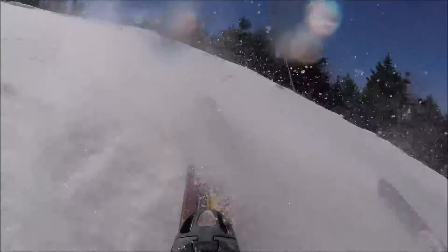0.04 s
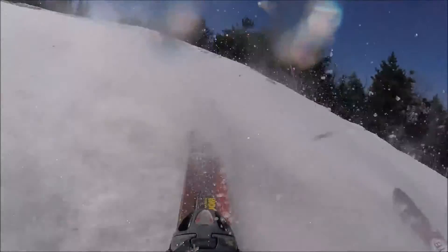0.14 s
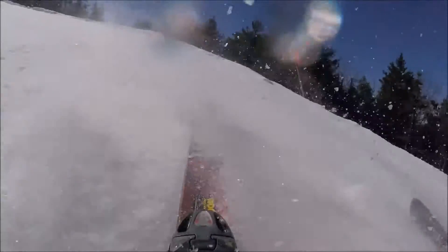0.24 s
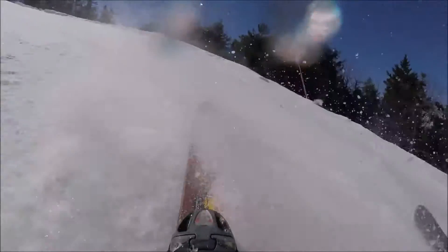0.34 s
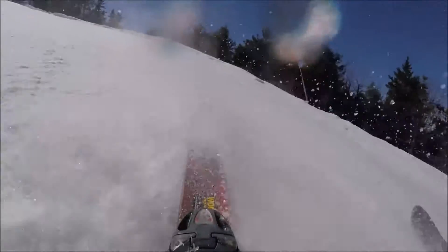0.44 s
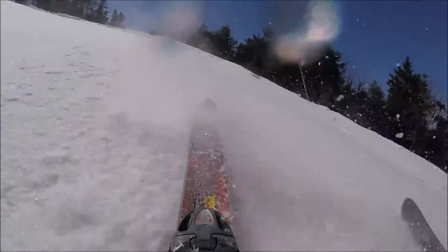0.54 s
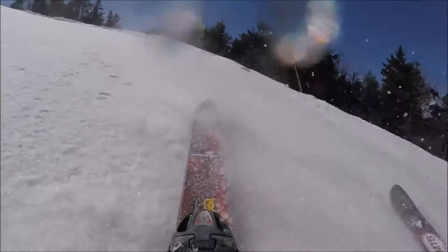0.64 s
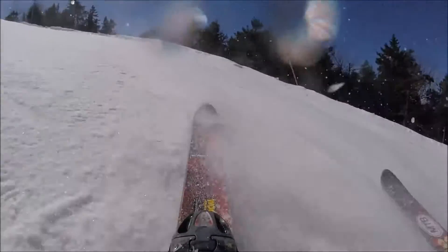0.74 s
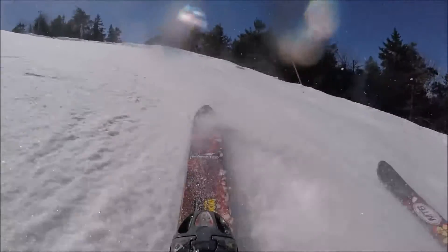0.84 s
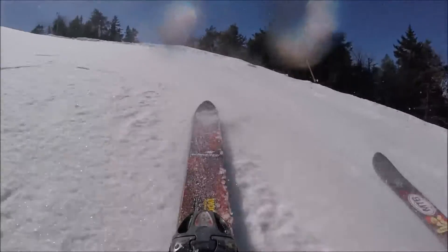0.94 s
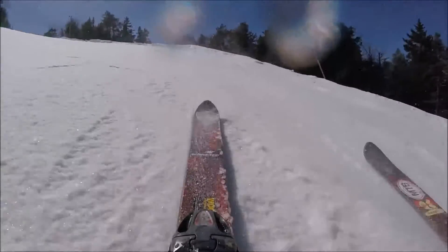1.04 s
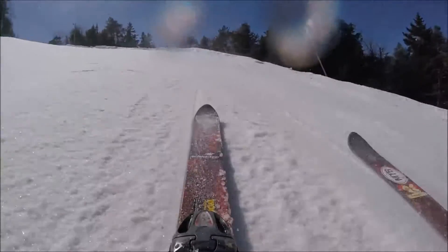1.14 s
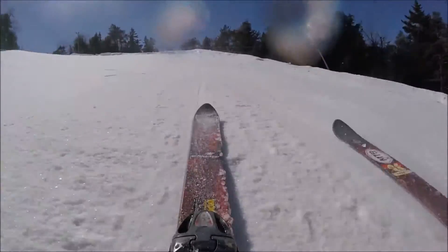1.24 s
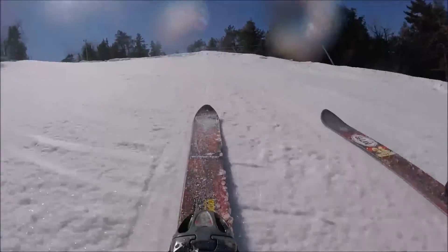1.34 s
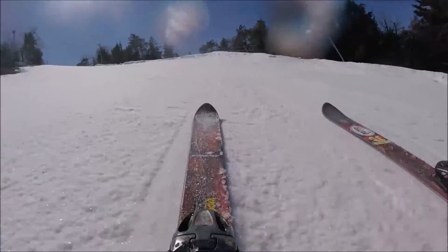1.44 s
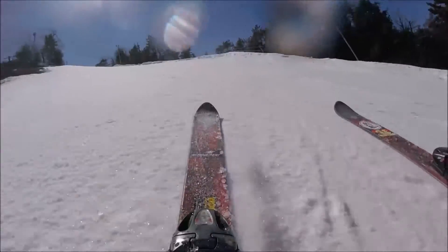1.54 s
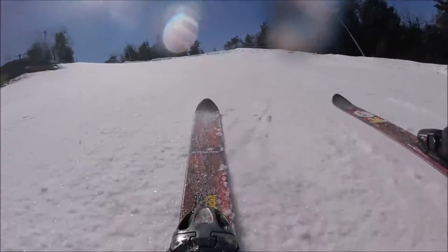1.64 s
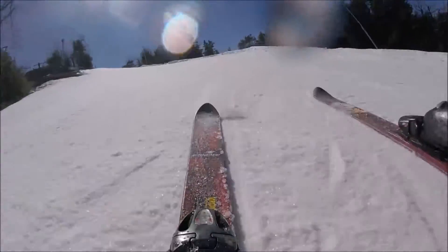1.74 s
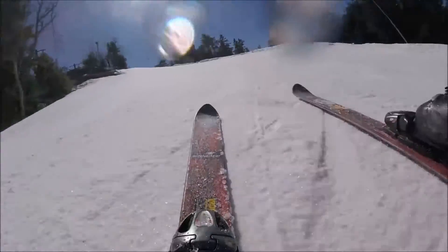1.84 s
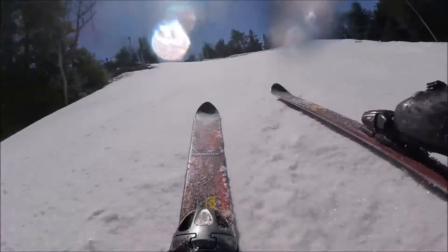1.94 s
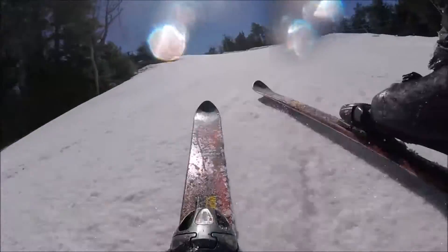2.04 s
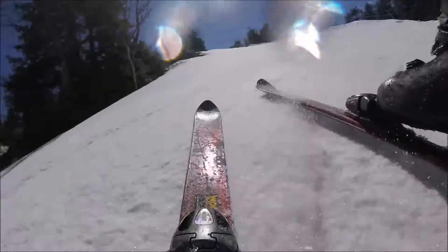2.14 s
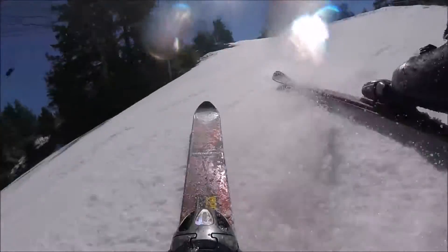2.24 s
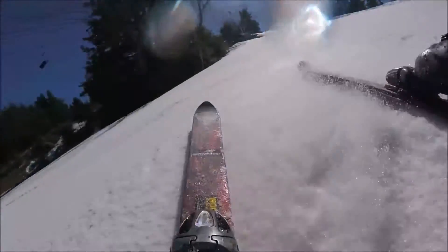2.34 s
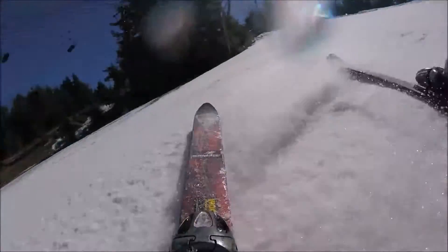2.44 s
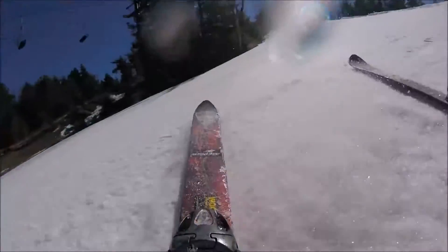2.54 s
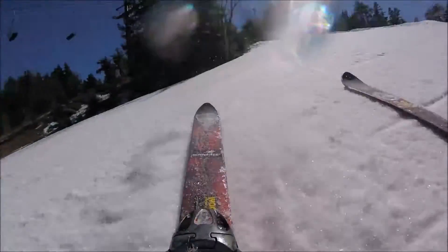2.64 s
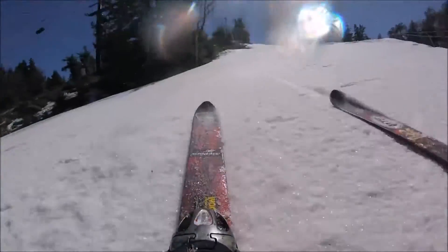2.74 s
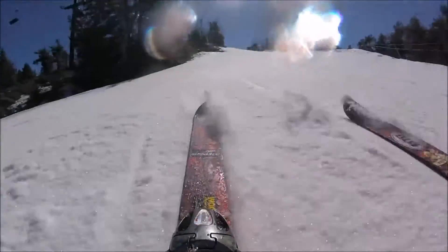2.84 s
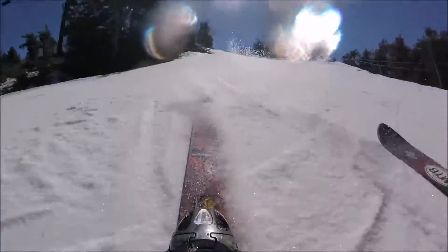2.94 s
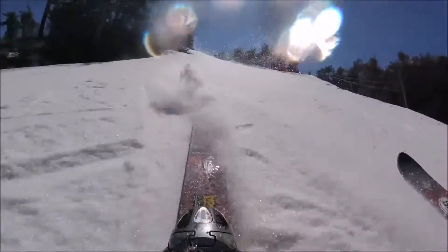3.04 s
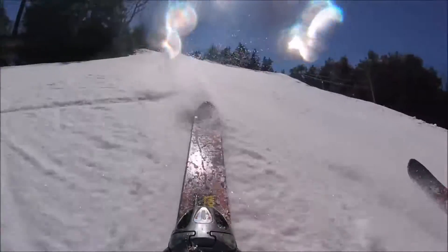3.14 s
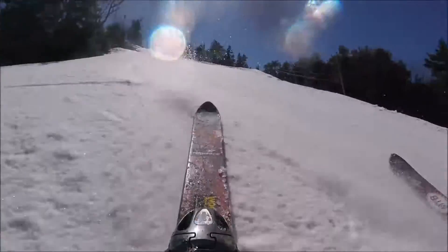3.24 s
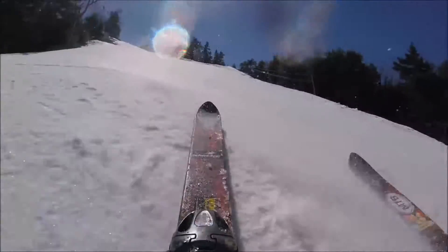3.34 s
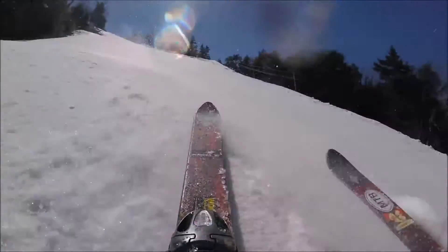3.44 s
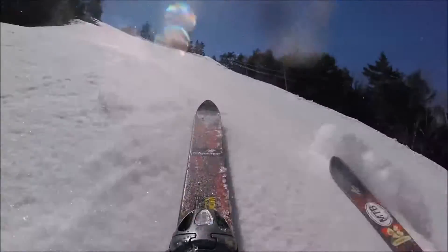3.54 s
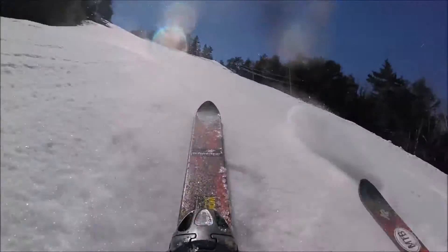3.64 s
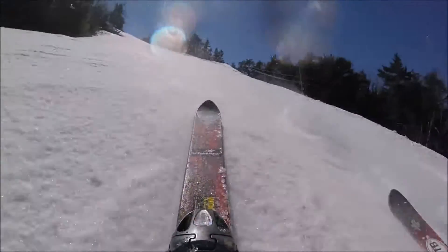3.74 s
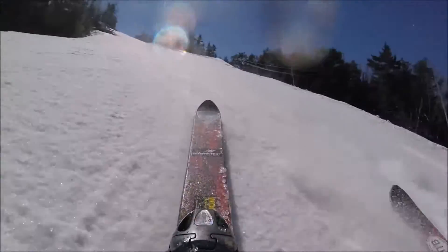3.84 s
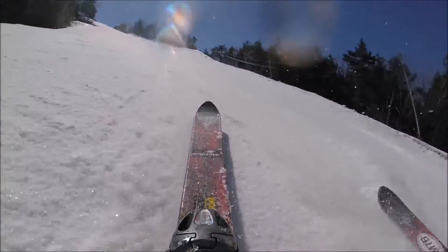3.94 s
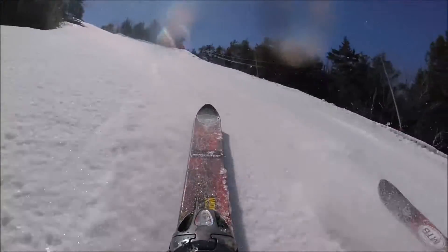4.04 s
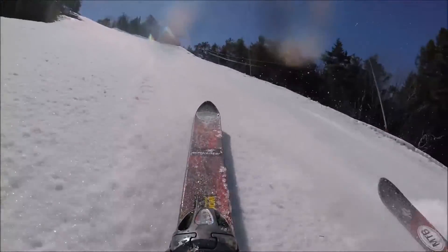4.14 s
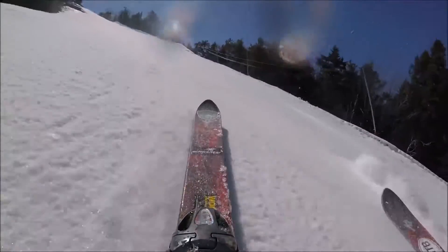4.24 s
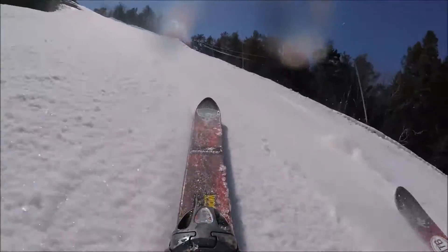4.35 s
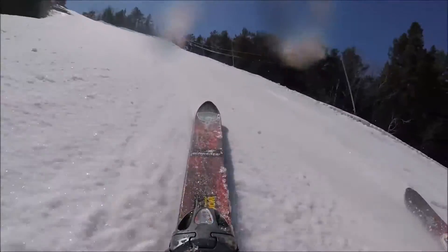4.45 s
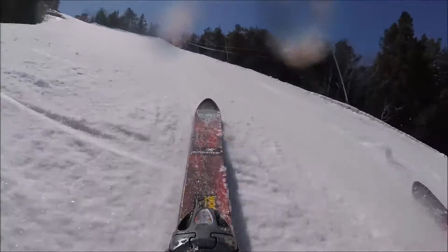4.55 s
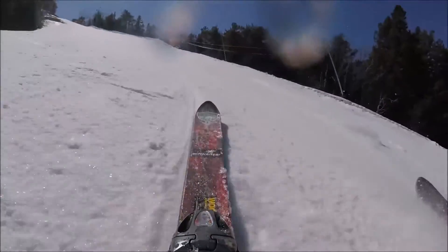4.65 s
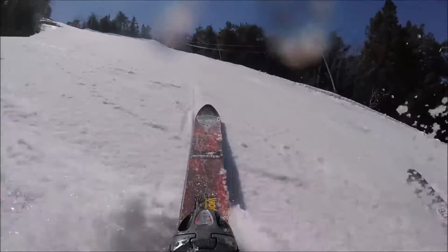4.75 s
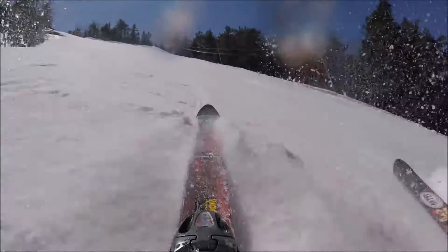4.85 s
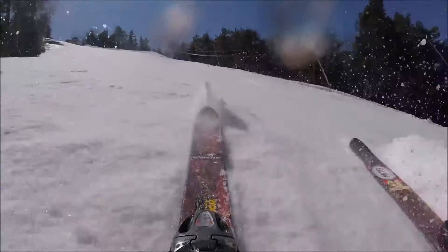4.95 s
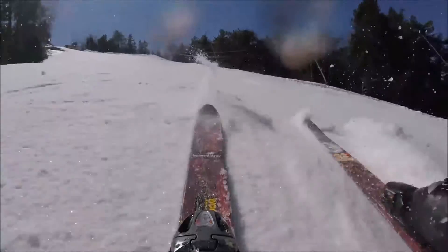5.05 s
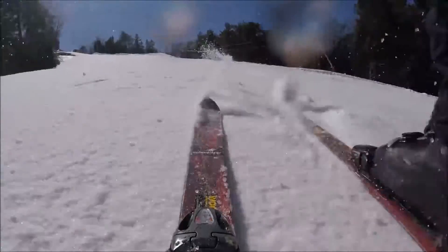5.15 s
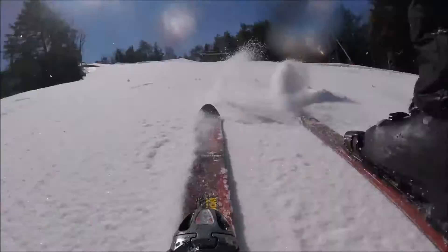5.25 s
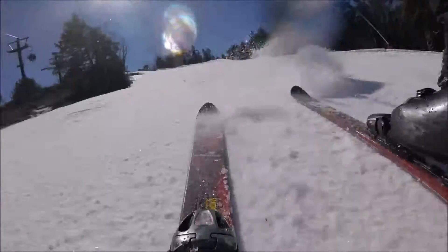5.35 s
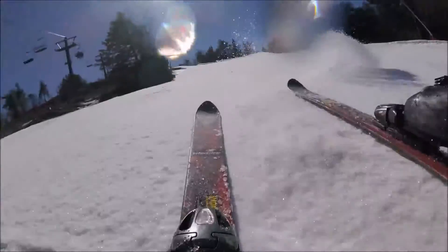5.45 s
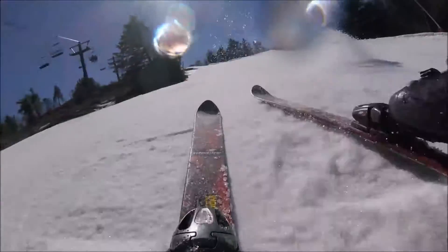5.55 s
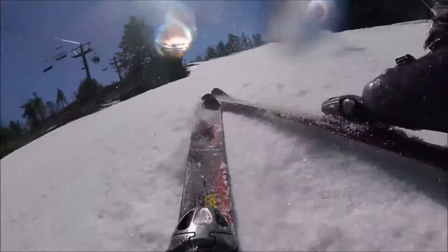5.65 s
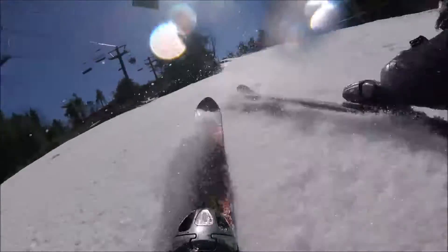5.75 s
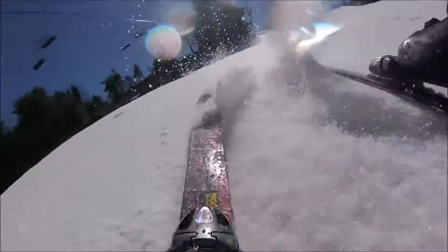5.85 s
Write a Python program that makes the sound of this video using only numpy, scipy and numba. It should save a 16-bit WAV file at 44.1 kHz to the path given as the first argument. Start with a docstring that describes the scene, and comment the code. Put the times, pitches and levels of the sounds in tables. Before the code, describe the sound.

Skis carve through soft snow, a grainy scrape and crunch swelling with each turn and easing between. Fine spray hisses on the camera case with a thin, high ring. The microphone rides just above one ski, so bumps come through as low shuddering thumps while wind buffets and rumbles. After a strong opening turn and a quieter glide, several turns follow closely, with a few sharp knocks from hard lumps. The open slope gives no echo.

```python
"""Ski edges carve turns through soft snow, crushing and shearing it in clumps.
Heard from a cased camera riding just above one ski: fine spray hisses on the case and rings it
near 5.5 kHz, and a few hard lumps knock. Bumps shake the ski and camera mount near 75 Hz,
and wind buffets the microphone."""
import sys
import numpy as np
from scipy import signal
from scipy.fft import rfft, irfft, next_fast_len
from scipy.io import wavfile
from scipy.ndimage import uniform_filter1d
from numba import njit

SR = 44100
rng = np.random.default_rng(int(sys.argv[2]) if len(sys.argv) > 2 else 0)


def master_out(mix):
    """Clip the mix to full scale and print it as 16-bit PCM to the path in sys.argv[1]."""
    frames = np.transpose(np.atleast_2d(mix))
    ceiling = np.clip(frames, -1, 1)
    pcm = np.round(ceiling * 32767).astype(np.int16)
    wavfile.write(sys.argv[1], SR, pcm)


N = 259749
TIME_S = np.arange(N) / SR


def undb(db):
    return 10 ** (np.asarray(db) / 20)


def unit_rms(x):
    return x / np.sqrt(np.mean(x ** 2))


def power_sum(gains):
    """Joint gain of unrelated noises."""
    return np.sqrt(sum(np.square(g) for g in gains))


def curves(table):
    """Each column after time_s, interpolated linearly."""
    time_s, *columns = np.transpose(table)
    return [np.interp(TIME_S, time_s, column) for column in columns]


def swell(centre_s, half_s):
    """Gaussian hump of height 1."""
    out = np.zeros(N)
    near = slice(*np.searchsorted(TIME_S, [centre_s - 4 * half_s, centre_s + 4 * half_s]))
    out[near] = np.exp(-((TIME_S[near] - centre_s) / half_s) ** 2)
    return out


def humps(table):
    """Joint gain of a row of swells."""
    return power_sum(undb(db) * swell(centre_s, half_s) for centre_s, half_s, db in table)


def fade(full_s, hold_s, rise_s_per_10db, fall_s_per_10db):
    """Rise, hold and fall, linear in dB."""
    before_s = np.maximum(full_s - TIME_S, 0)
    after_s = np.maximum(TIME_S - full_s - hold_s, 0)
    return undb(-10 * (before_s / rise_s_per_10db + after_s / fall_s_per_10db))


def strike(age_s, rise_s, t60_s):
    """Exponential attack and decay."""
    return (1 - np.exp(-age_s / rise_s)) * np.exp(-np.log(1000) * age_s / t60_s)


def drift(rate_hz):
    """Smooth random drift, rms 1."""
    steps = rng.standard_normal(N // 10)
    return unit_rms(np.interp(TIME_S * rate_hz, np.arange(len(steps)), steps))


def grains(rate_hz, spread_db):
    """Snow crystals break at random moments: many small, a few large."""
    breaks = rng.random(N) < rate_hz / SR
    size = undb(spread_db * np.minimum(rng.exponential(size=N), 2 * np.e))
    return unit_rms(breaks * size * rng.choice([-1, 1], N))


def steady(x, span_s):
    """Hold rms 1 over the span, keeping faster flutter."""
    size = int(span_s * SR) + 1
    return x / np.sqrt(uniform_filter1d(uniform_filter1d(x ** 2, size), size) + 1e-12)


def colour(x, spectrum):
    """Minimum-phase filter from (freq_hz, gain_db) points."""
    size = next_fast_len(len(x) + 8192, True) * 2
    freq_hz, gain_db = np.transpose(spectrum)
    bins_hz = np.maximum(np.fft.rfftfreq(size, 1 / SR), 1)
    gain = undb(np.interp(np.log(bins_hz), np.log(freq_hz), gain_db))
    cepstrum = irfft(np.log(gain))
    cepstrum[1:size // 2] *= 2
    cepstrum[size // 2 + 1:] = 0
    return irfft(rfft(x, size) * np.exp(rfft(cepstrum)))[:len(x)]


def resonate(x, centre_hz, width_hz):
    """Fixed resonance, peak gain 1."""
    return signal.lfilter(*signal.iirpeak(centre_hz, centre_hz / width_hz, fs=SR), x)


@njit
def sweep(x, centre_hz, width_hz):
    """Moving resonance, peak gain 1."""
    out, band_state, low_state = np.empty(len(x)), 0., 0.
    for i in range(len(x)):
        step, damping = np.tan(np.pi * centre_hz[i] / SR), width_hz / centre_hz[i]
        band = (band_state + step * (x[i] - low_state)) / (1 + step * (step + damping))
        band_state = 2 * band - band_state
        low_state += 2 * step * band
        out[i] = damping * band
    return out


# centre_s, half_s, drop_db
LIFT_OFFS = [(1.3, .015, 3), (1.52, .03, 2), (1.785, .016, 6), (2.825, .03, 9), (3.82, .025, 2),
             (5.035, .06, 12.5)]


def lift(share=1):
    """The skis go light and leave the snow: the gain dips by a share of drop_db."""
    drop_db = sum(db * swell(centre_s, half_s) for centre_s, half_s, db in LIFT_OFFS)
    return undb(-share * drop_db)


# time_s, offset_db
GLIDE_PACE = [(0, -3), (1.0, -4.5), (1.5, -3), (2.1, -1.5), (2.8, -1.5), (3.7, .7), (5.1, 0), (5.89, -.5)]


def glide(full_speed_db):
    """Gain of the skis running flat; it follows their pace."""
    return undb(full_speed_db + curves(GLIDE_PACE)[0])


# time_s, level_db
AIRFLOW = [(0, -29), (.15, -26.5), (.75, -31.8), (1.05, -35), (1.45, -40.5), (1.7, -36), (2.25, -25.3),
           (2.55, -25), (2.78, -30), (3.02, -24.5), (3.15, -36), (3.45, -30.5), (3.9, -34), (4.3, -29),
           (4.65, -38), (4.95, -44), (5.14, -34.5), (5.5, -32), (5.89, -40)]
# centre_s, half_s, level_db
WIND_SLAPS = [(.078, .018, -18), (1.255, .01, -28), (1.752, .01, -26), (2.14, .03, -22), (2.49, .03, -23),
              (2.735, .012, -25), (2.85, .04, -27), (3.46, .015, -25), (3.78, .012, -25), (5.42, .012, -24)]
RUMBLE_GUSTS = [(.23, .1, -20), (.58, .05, -26), (.88, .08, -35), (1.24, .06, -37), (2.56, .08, -29),
                (2.93, .08, -21), (3.2, .1, -32), (3.47, .07, -15.5), (3.98, .08, -28), (4.42, .06, -22),
                (4.72, .04, -29), (4.97, .08, -35), (5.51, .11, -22)]
# freq_hz, gain_db
EDDY_SPECTRUM = [(50, -25.5), (95, -3), (125, 1.5), (165, -1), (220, -4.5), (320, -20.5), (520, -19.5),
                 (1200, -58)]
RUMBLE_SPECTRUM = [(8, -28), (18, -7), (25, -3), (32, 0), (42, 7), (52, 3), (75, -10), (200, -75)]


def wind():
    """Eddies buffet the microphone, harder at jolts and slaps, over a deep gusting rumble."""
    airflow_db, = curves(AIRFLOW)
    # each jolt sweeps the microphone through the air
    thumps = humps([(start_s + .015, .035, peak_db - 22) for start_s, peak_db in MOUNT_JOLTS])
    turbulence = rng.standard_normal(N) * undb(2.6 * drift(70))
    eddies = steady(colour(turbulence, EDDY_SPECTRUM), span_s=.27)
    puffs = unit_rms(undb(1.6 * np.minimum(drift(32), 1)))
    rumble = steady(colour(rng.standard_normal(N), RUMBLE_SPECTRUM), span_s=.12)
    eddy_gain = power_sum([undb(airflow_db) * lift(share=.35), thumps, humps(WIND_SLAPS)])
    rumble_gain = power_sum([undb(airflow_db - 8.5), humps(RUMBLE_GUSTS)])
    return eddies * puffs * eddy_gain + rumble * rumble_gain


# start_s, peak_db
MOUNT_JOLTS = [(.055, -8), (.135, -10.5), (.74, -14.5), (1.245, -20), (1.375, -21), (1.64, -19.5),
               (1.93, -11.5), (2.1, -9), (2.15, -11), (2.185, -7), (2.225, -9), (2.27, -10), (2.471, -8.5),
               (2.86, -16), (3.33, -11), (3.501, -7), (3.56, -10), (3.618, -5), (3.78, -12), (3.91, -14),
               (4.18, -12), (4.295, -6.5), (4.345, -5.5), (4.42, -11), (4.52, -15), (5.43, -7),
               (5.49, -7.5), (5.555, -13), (5.67, -17), (5.799, -8.5)]


def mount(pitch_hz=75, ground_db=-31.5):
    """The camera mount shudders with rough ground and rushing air; bumps set it swinging."""
    airflow_db, = curves(AIRFLOW)
    ground = resonate(rng.standard_normal(N), pitch_hz, width_hz=81)
    shudder = steady(resonate(ground, pitch_hz, width_hz=17), span_s=.065) * undb(1.5 * drift(25))
    out = shudder * power_sum([undb(airflow_db + 6), undb(ground_db)]) * lift()
    swings_hz = pitch_hz * (1 + .025 * rng.standard_normal(len(MOUNT_JOLTS)))
    for (start_s, peak_db), swing_hz in zip(MOUNT_JOLTS, swings_hz):
        start = int(start_s * SR)
        span = slice(start, start + SR // 2)
        age_s = TIME_S[:len(out[span])]
        envelope = strike(age_s, rise_s=.015, t60_s=.17)
        envelope /= envelope.max()
        swing = undb(peak_db) * np.sin(2 * np.pi * swing_hz * age_s)
        out[span] = out[span] * (1 - envelope) + swing * envelope
    return out


# start_s, crack_db, crack_t60_s, thud_peak_db, thud_hz
HARD_LUMPS = [(.167, -24, .015, -21, 480), (1.840, -22.5, .02, -38, 520), (2.372, -24.5, .025, -29, 760),
              (2.468, -21, .018, -22, 520), (2.724, -25, .03, -32, 520), (2.961, -27, .025, -19, 250),
              (2.976, -24, .014, -17, 190), (3.017, -27, .01, -13, 240), (3.460, -28, .015, -19, 300),
              (3.508, -24, .018, -34, 520), (4.514, -23, .026, -30, 520), (4.663, -21, .037, -22, 420),
              (4.724, -24, .03, -20, 700), (4.821, -22, .023, -25, 520), (4.941, -27, .04, -25, 400),
              (5.786, -15.8, .034, -16, 440)]
# freq_hz, gain_db
CRACK_SPECTRUM = [(80, -27), (250, -5.5), (500, 2), (850, 2), (1400, -4), (2200, -6.5), (3300, -12),
                  (4200, -19), (5600, -4), (7000, -45), (12000, -68)]


def knocks():
    """A hard lump crumbles with a short crack; the struck ski thuds."""
    out = np.zeros(N + SR)
    age_s = TIME_S[:SR // 10]
    for start_s, crack_db, crack_t60_s, thud_peak_db, thud_hz in HARD_LUMPS:
        thud = strike(age_s, rise_s=.002, t60_s=.018) * np.sin(2 * np.pi * thud_hz * age_s)
        crumble = strike(age_s, rise_s=.00037, t60_s=crack_t60_s) * rng.standard_normal(len(age_s))
        crack = colour(crumble, CRACK_SPECTRUM)
        crack /= crack[age_s < .006].std()
        start = int(start_s * SR)
        out[start:start + len(age_s)] += undb(crack_db) * crack + undb(thud_peak_db) * thud / thud.max()
    return out[:N]


# centre_s, half_s, level_db
SKI_LANDINGS = [(2.14, .035, -28), (2.99, .07, -24), (3.65, .015, -26), (3.76, .02, -26), (4.35, .03, -27),
                (5.14, .02, -33)]
# freq_hz, gain_db
PACKING_SPECTRUM = [(80, -24), (150, -2), (210, 1), (320, -2), (420, -8), (650, -24), (1500, -55)]


def landings():
    """Weight comes down on a ski and packs the snow with a dull, lumpy thump."""
    packing = colour(grains(rate_hz=900, spread_db=2.5), PACKING_SPECTRUM)
    return steady(packing, span_s=.04) * humps(SKI_LANDINGS)


# centre_s, half_s, level_db
CRUST_PATCHES = [(.333, .008, -29), (2.168, .008, -29), (2.535, .012, -23), (2.70, .012, -30),
                 (2.963, .01, -35), (3.502, .012, -26.5), (3.583, .008, -27), (3.955, .012, -30),
                 (4.138, .012, -29), (4.74, .009, -26.5), (4.822, .008, -32), (5.135, .02, -37)]
# freq_hz, gain_db
CRUST_SPECTRUM = [(600, -20), (1400, -5), (2100, -1), (3000, 0), (4000, -6), (5600, -3), (6500, -12),
                  (9000, -18), (12000, -58)]


def scuffs():
    """An edge catches crust in a brief, bright rasp."""
    rasp = colour(grains(rate_hz=5000, spread_db=2), CRUST_SPECTRUM)
    return steady(rasp, span_s=.02) * humps(CRUST_PATCHES)


# peak_s, rise_s_per_10db, fall_s_per_10db, ring_db, powder_db
SNOW_PLUMES = [(.01, .03, .65, -24.3, -37.5), (.64, .18, .22, -35, -39.5), (1.72, .12, .08, -31, -47),
               (2.04, .14, .25, -30.5, -40), (2.36, .3, .3, -19.4, -35.5), (2.56, .08, .06, -26.5, -41.5),
               (3.16, .15, .25, -25.8, -34.3), (3.28, .05, .08, -32, -36), (3.41, .25, .2, -23, -34),
               (3.98, .17, .22, -22.3, -30.8), (4.13, .04, .04, -28, -35), (4.3, .08, .14, -29.5, -43),
               (4.6, .2, .2, -25.8, -34), (4.74, .1, .27, -25.5, -33.5), (5.33, .22, .1, -23, -38),
               (5.8, .2, .25, -27, -40.5)]
# freq_hz, gain_db
CASE_SPECTRUM = [(1800, -18), (2600, -18.5), (3000, -13.5), (3450, -21), (3900, -23), (4250, -17),
                 (4650, -10.5), (5050, -5), (5400, -1.5), (5700, .6), (5950, -7.5), (6250, -17.5),
                 (7000, -32), (9000, -48)]
POWDER_SPECTRUM = [(4500, -43), (6200, 6.5), (7000, 4), (8000, 0.5), (9000, -4.5), (9900, -10.5),
                   (10900, -12.5), (11500, -28), (12300, -62)]


def spray():
    """Thrown crystals ring the camera case; the finest powder hisses above the ring."""
    plume_ring, plume_powder = power_sum(np.outer(undb(levels_db), fade(peak_s, 0, rise, fall))
                                         for peak_s, rise, fall, *levels_db in SNOW_PLUMES)
    flurries = undb(.61 * drift(40) + drift(250))
    crystals = flurries * grains(rate_hz=9000, spread_db=2)
    ring = steady(colour(crystals, CASE_SPECTRUM), span_s=.14)
    powder = undb(drift(45)) * grains(rate_hz=25000, spread_db=3.7)
    hiss = unit_rms(colour(powder, POWDER_SPECTRUM))
    ring_gain = power_sum([plume_ring, glide(-31)])
    hiss_gain = power_sum([plume_powder, glide(-43.5)])
    return (ring * ring_gain + hiss * hiss_gain) * lift(share=.08)


# centre_s, half_s, level_db
SNOW_HEAPS = [(.12, .1, -28), (.63, .12, -32), (1.0, .025, -31), (1.44, .04, -39), (1.67, .07, -38),
              (2.18, .08, -28.5), (2.5, .08, -27), (2.76, .06, -34), (2.96, .07, -28.5), (3.15, .1, -32),
              (3.6, .08, -32), (3.76, .02, -28), (4.25, .2, -32), (5.14, .02, -32), (5.45, .1, -36)]
# freq_hz, gain_db
SOFT_SNOW_SPECTRUM = [(100, -23), (180, -10), (240, 1), (340, -3), (480, -2.5), (600, -5), (900, -18),
                      (2000, -53)]


def bases(carve_plough):
    """The flat of the skis presses soft snow down in small, lumpy collapses."""
    gain = power_sum([carve_plough, glide(-38), humps(SNOW_HEAPS)])
    collapses = undb(1.8 * drift(110)) * grains(rate_hz=2500, spread_db=2.5)
    return steady(colour(collapses, SOFT_SNOW_SPECTRUM), span_s=.12) * gain * lift()


# full_s, hold_s, rise_s_per_10db, fall_s_per_10db, scrape_db, grit_db, pressure_0_to_1, ski_hz
EDGE_BITES = [(.01, .13, .03, .8, -25.3, -25.8, .05, 900), (.56, .1, .12, .35, -32, -32, .25, 700),
              (1.05, .12, .06, .35, -35, -49, .4, 700), (1.35, .12, .2, .15, -40, -47, .1, 700),
              (1.68, .07, .12, .02, -33, -42, .3, 650), (1.92, .06, .04, .1, -36, -35, .1, 800),
              (2.13, .03, .1, .03, -29, -31, .2, 800), (2.29, .07, .27, .04, -22.8, -28.5, .2, 900),
              (2.37, .018, .015, .02, -19.8, -36, .7, 820), (2.46, .12, .1, .09, -21, -26.7, .2, 900),
              (2.64, .022, .04, .08, -26, -35, .3, 800), (2.89, .08, .04, .06, -33, -37, .1, 800),
              (3.15, .12, .15, .2, -25.4, -30.8, .55, 700), (3.36, .14, .12, .2, -25.3, -28.6, .25, 790),
              (3.62, .03, .04, .05, -33, -33, .1, 790), (3.97, .05, .13, .1, -20.5, -26, .5, 1100),
              (4.11, .04, .04, .1, -24.7, -30, .4, 900), (4.35, .08, .14, .12, -26.5, -29, 1, 850),
              (4.59, .05, .1, .08, -20.8, -28.5, .8, 780), (4.72, .03, .03, .07, -20.5, -29.5, .9, 800),
              (4.8, .05, .05, .06, -26.5, -33, .7, 780), (4.93, .02, .04, .04, -33, -35, .4, 800),
              (5.3, .04, .07, .05, -27, -29, .15, 820), (5.45, .07, .05, .16, -28.7, -33, .2, 750)]


def carving():
    """Scrape, grit and plough gains, then pressure and pitch curves; a ski on edge ploughs less."""
    gains, loads = [], []
    for full_s, hold_s, rise, fall, scrape_db, grit_db, pressure, ski_hz in EDGE_BITES:
        plough_db = scrape_db - 4.2 - 4 * pressure
        gains.append(np.outer(undb([scrape_db, grit_db, plough_db]), fade(full_s, hold_s, rise, fall)))
        loads.append((full_s + hold_s / 2, pressure, ski_hz))
    return power_sum(gains), curves(loads)


# freq_hz, gain_db
CRUSH_SPECTRUM = [(200, -41.5), (400, -12.5), (560, -4), (700, -2.5), (1080, -3), (1400, -3.5),
                  (1750, -11.5), (2400, -17.5), (4000, -50.5)]
GRIT_SPECTRUM = [(700, -17.5), (1400, -4.5), (1900, 0.5), (2500, -5.5), (3000, -6.5), (3800, -12),
                 (4600, -15.5), (7000, -65)]


def edges(carve_scrape, carve_grit, pressure, ski_hz):
    """Snow packs and shears off in clumps; the loaded ski rings hollow, shifting pitch as it bends."""
    clumps = undb(drift(45) + 1.42 * drift(260))
    crush = steady(colour(clumps * grains(rate_hz=4500, spread_db=2), CRUSH_SPECTRUM), span_s=.064)
    grit = steady(colour(clumps * grains(rate_hz=7000, spread_db=1.5), GRIT_SPECTRUM), span_s=.044)
    ski_drive = colour(clumps * grains(rate_hz=3000, spread_db=0), CRUSH_SPECTRUM)
    hollow = steady(sweep(ski_drive, ski_hz, width_hz=120.), span_s=.042)
    # pressure shifts scrape energy into the ski's resonance
    hollow_gain = undb(1) * pressure
    scrape = (crush + hollow_gain * hollow) / np.sqrt(1 + hollow_gain ** 2) * undb(.8 * drift(22))
    scrape_gain = power_sum([carve_scrape, glide(-39.5), undb(-7.5) * humps(SNOW_HEAPS)])
    grit_gain = power_sum([carve_grit, glide(-38)])
    return (scrape * scrape_gain + grit * grit_gain) * lift(share=.5)


def scene():
    """One microphone, direct sound only: open snow gives no echo."""
    (scrape, grit, plough), (pressure, ski_hz) = carving()
    snow = edges(scrape, grit, pressure, ski_hz) + bases(plough) + landings() + scuffs() + spray()
    return (snow + mount() + wind() + knocks())[None]


def record(dry):
    """The camera rounds the largest peaks and cuts the top."""
    drive, cutoff_hz = .6, 12200
    lowpass = signal.ellip(8, .2, 70, cutoff_hz, fs=SR, output="sos")
    return signal.sosfilt(lowpass, np.tanh(drive * dry) / drive)


dry = scene()
out = record(dry)
master_out(out)
```